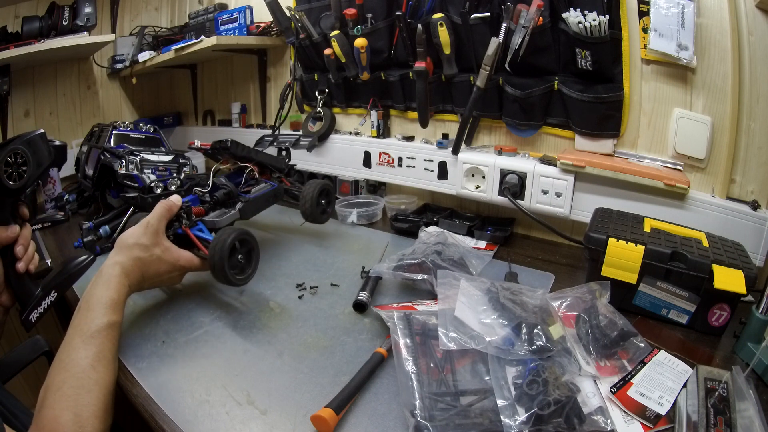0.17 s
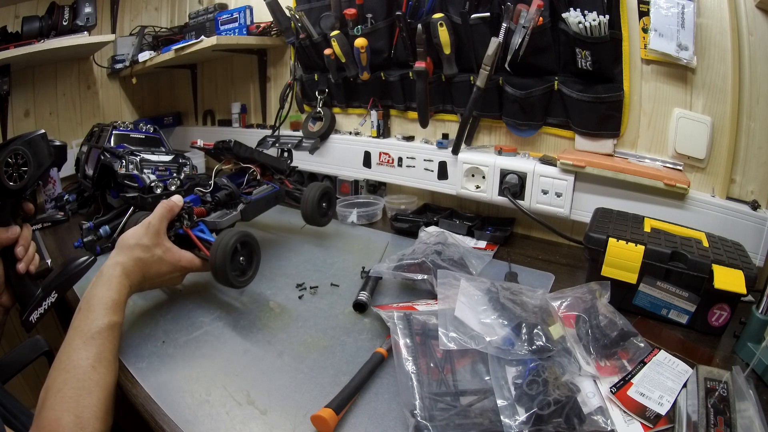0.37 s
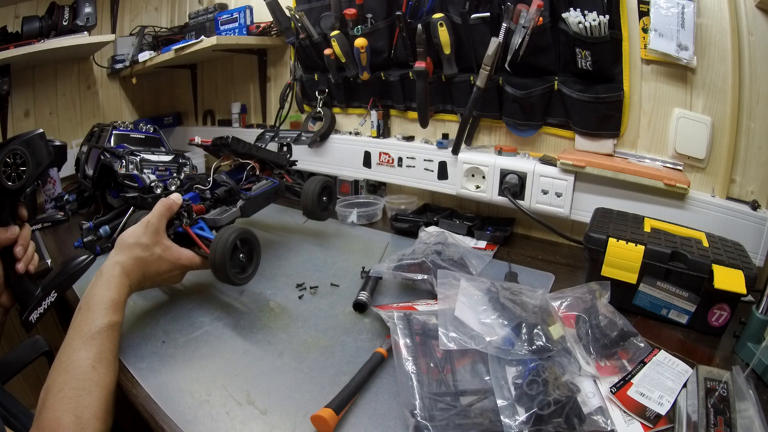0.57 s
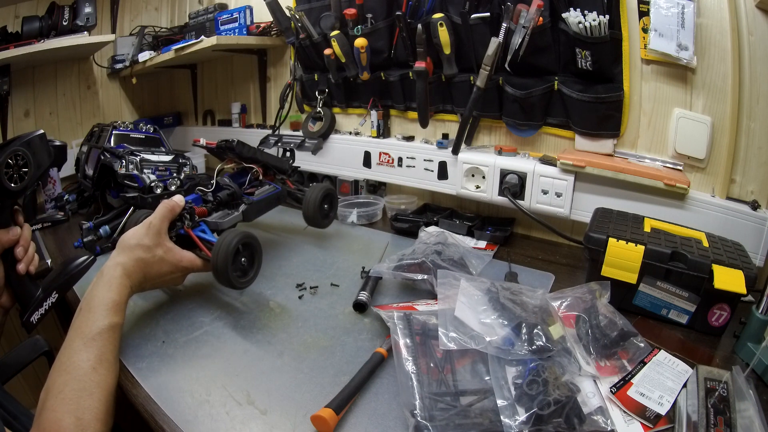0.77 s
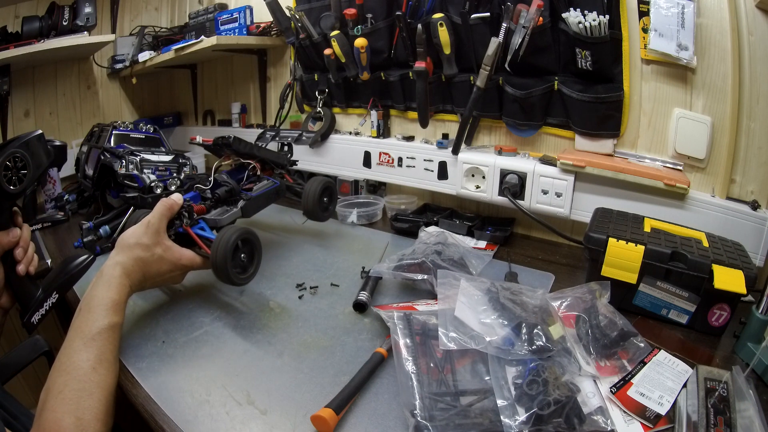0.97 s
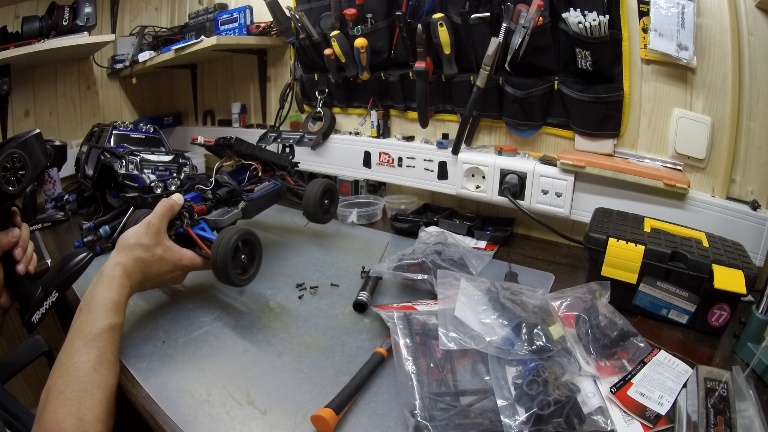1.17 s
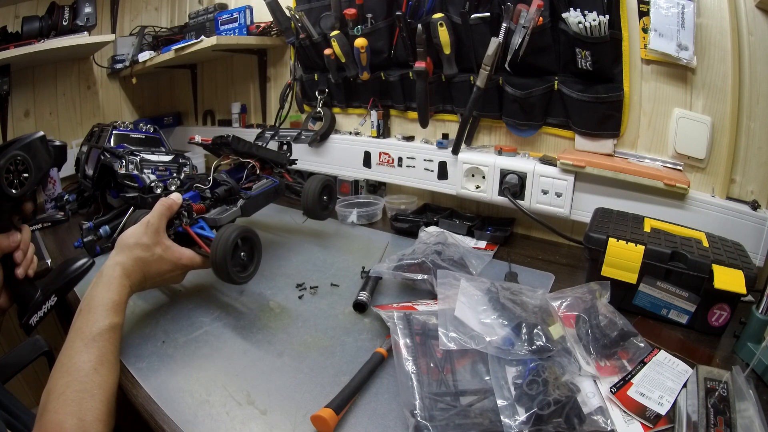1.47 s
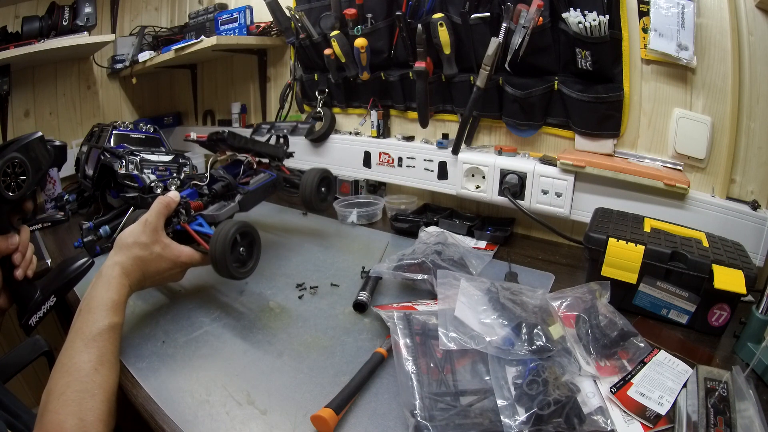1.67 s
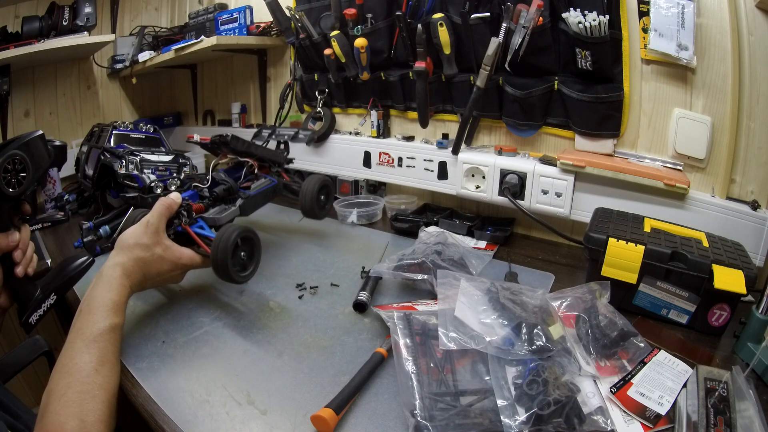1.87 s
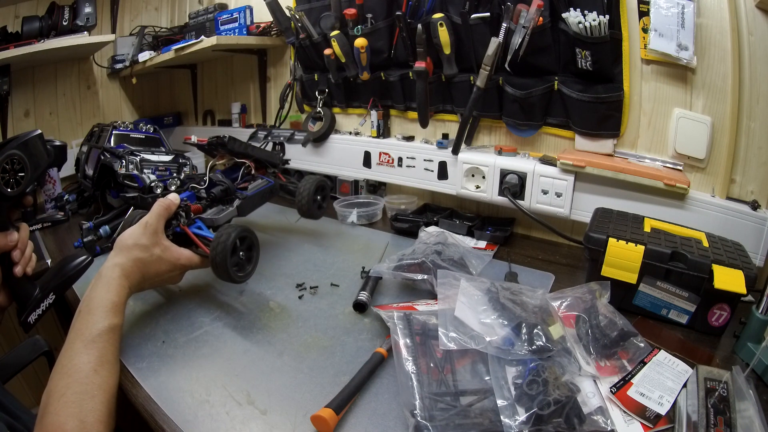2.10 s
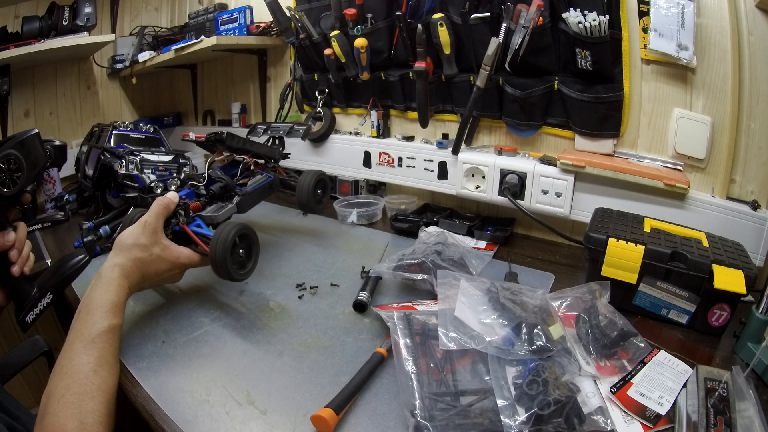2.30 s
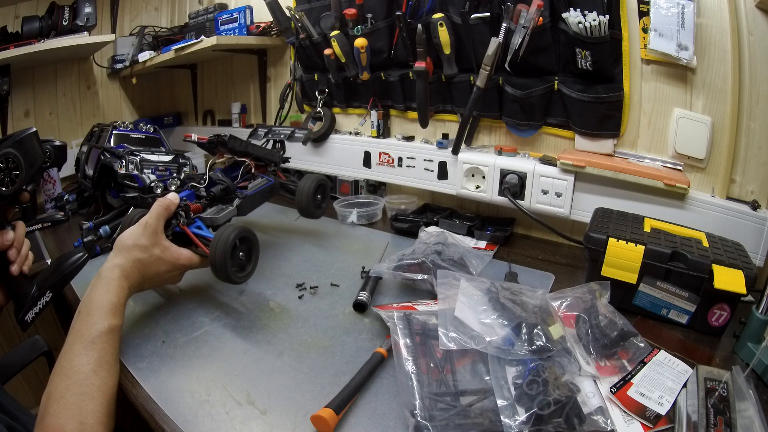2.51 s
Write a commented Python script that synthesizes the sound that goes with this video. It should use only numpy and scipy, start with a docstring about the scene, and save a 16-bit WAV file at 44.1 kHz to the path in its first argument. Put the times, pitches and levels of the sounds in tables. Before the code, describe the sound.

Two whirring, rattling bursts from a small electric model car, its wheels spinning freely.

```python
"""A thin motor whistle swells, then gear teeth clatter and whine: a radio-controlled car, held with its
wheels off a workbench, is run up to full speed twice. Switched current makes the windings whistle;
tooth impacts ring the gears and the plastic chassis, and the turning shafts add harmonics. Near the end
of each run-up and on braking the drivetrain chatters hard and overloads the microphone.
Between the runs the car coasts and its slack gears tick."""
import sys
import numpy as np
from scipy import signal
from scipy.fft import rfft, irfft
from scipy.io import wavfile
from scipy.ndimage import uniform_filter1d

SR = 44100
rng = np.random.default_rng(int(sys.argv[2]) if len(sys.argv) > 2 else 0)


def store_wav(level_fs):
    """Save 16-bit WAV to argv[1]."""
    pcm = np.round(np.clip(np.atleast_2d(level_fs), -1, 1) * 32767)
    wavfile.write(sys.argv[1], SR, pcm.T.astype(np.int16))


N = 116865
T = np.arange(N) / SR

# Modes of the chassis and gear case. Each row: frequency in Hz, width in Hz, boost in dB.
BODY_MODES = [(512, 25, 8), (722, 110, 5), (1043, 13.7, 9), (1115, 22, 9), (1543, 34, -2.5), (1644, 63, 7),
              (2259, 14, 2), (2416, 103, 4.5), (3780, 54, 2), (7250, 200, 3), (12050, 300, 0.5)]


def amp(db):
    """Amplitude grows tenfold with every 20 dB."""
    return 10 ** (np.asarray(db) / 20)


def unit(x):
    """Normalisation to an rms of 1."""
    return x / np.sqrt(np.mean(x ** 2) + 1e-20)


def curve(rows, column=1):
    """Linear interpolation of one column over time."""
    rows = np.array(rows)
    return np.interp(T, rows[:, 0], rows[:, column])


def colour(x, spectrum, modes=()):
    """A minimum-phase filter imposes a spectrum and its resonances, falling steeply outside it."""
    hz, db = np.transpose(spectrum)
    bins = np.fft.rfftfreq(8192, 1 / SR)
    log_hz = np.log(bins + 1)
    outside = np.maximum(np.log(hz[0]) - log_hz, 0) + np.maximum(log_hz - np.log(hz[-1]), 0)
    modes_db = sum(boost / (1 + (2 * (bins - at) / width) ** 2) for at, width, boost in modes)
    shape_db = np.interp(log_hz, np.log(hz), db) + modes_db - 50 * outside
    log_gain = np.log(amp(np.maximum(shape_db, -90)))
    mirrored = np.r_[log_gain, log_gain[-2:0:-1]]
    taps = np.fft.ifft(np.exp(np.conj(signal.hilbert(mirrored)))).real
    return signal.fftconvolve(x, taps[:len(taps) // 2])[:N]


def band(hz, width_hz):
    """Noise through one steep resonance; centred on 0 Hz it is a slow random fluctuation."""
    bins = np.fft.rfftfreq(N, 1 / SR)
    return unit(irfft(rfft(rng.standard_normal(N)) / (1 + (2 * (bins - hz) / width_hz) ** 4), N))


def blows(rows, decay_s):
    """Damping makes the envelope of each sudden blow decay exponentially."""
    return sum(amp(db) * (T >= start) * np.exp(-abs(T - start) / decay_s) for start, db in rows)


def impacts(speed):
    """Shot noise: teeth strike at random, more densely with speed, over a steady rub."""
    per_second = 500 + 4500 * speed
    hits = (rng.random(N) < per_second / SR) * rng.choice([-1, 1], N)
    hits = hits * amp(np.clip(rng.standard_normal(N), -2, 2))
    local_power = abs(uniform_filter1d(hits ** 2, size=900))
    rub = 0.37 * rng.standard_normal(N)
    return unit(hits / np.sqrt(local_power + 1e-4) + rub)


def room_noise():
    """Stationary coloured noise forms the faint background of the room."""
    # Ambient spectrum. Each row: frequency in Hz, relative level in dB.
    spectrum = [(15, -54), (25, 0.5), (326, -8.5), (952, -5), (2020, -16.5), (2700, -12), (4380, -15),
                (12100, -12.5), (15000, -25)]
    return amp(-54) * unit(colour(rng.standard_normal(N), spectrum))


def workshop(x, t60_s=0.097, wet_db=-10):
    """Reverberation: sparse reflections from the bench and cluttered walls die away quickly."""
    t = T[:SR // 3]
    tail = rng.standard_normal(len(t)) * (rng.random(len(t)) < .06)
    tail *= (t > .002) * amp(-60 * t / t60_s)
    reflections = signal.fftconvolve(x, tail / np.linalg.norm(tail))[:N]
    return (x + amp(wet_db) * reflections) / np.hypot(1, amp(wet_db))


def overload_rumble():
    """A low rumble of shaped noise swells while the loudest chatter overloads the microphone."""
    # Swells of the rumble. Each row: centre in seconds, half width in seconds, level in dB.
    swells = [(0.662, 0.023, -33), (0.738, .024, -42), (1.577, 0.016, -39), (2.34, 0.022, -36)]
    # Rumble spectrum. Each row: frequency in Hz, relative level in dB.
    spectrum = [(25, -9), (120, 4.5), (400, -1.5), (900, -10)]
    envelope = sum(amp(db) * np.exp(-((T - centre) / width) ** 2) for centre, width, db in swells)
    return unit(colour(rng.standard_normal(N), spectrum)) * envelope


def coasting():
    """Backlash lets the unloaded gears tick, and the car bumps softly in the hand."""
    # Gear ticks and soft bumps. Each row: start in seconds, level in dB.
    ticks = [(1.703, -36), (1.731, -35), (1.757, -38), (1.809, -34), (1.865, -39.5), (1.884, -43),
             (1.913, -30), (1.954, -34), (1.999, -36.5), (2.025, -39)]
    bumps = [(2.04, -42), (2.1, -42)]
    # Tick spectrum. Each row: frequency in Hz, relative level in dB.
    spectrum = [(300, -23), (1000, -1.5), (3000, -3), (7000, -7.5), (12000, -16.5), (15000, -19)]
    ring = unit(colour(impacts(speed=.5), spectrum, BODY_MODES))
    thud = band(378, width_hz=470)
    return ring * blows(ticks, decay_s=0.014) + thud * blows(bumps, decay_s=0.028)


def take_up():
    """Impact excitation: the gears take up their slack and ring the gear case."""
    # Knock of the gears. Each row: start in seconds, level in dB.
    knocks = [(.179, -29.5)]
    return band(1075, width_hz=200) * blows(knocks, decay_s=0.054)


def windings(switch_hz=3050, swell_db_per_s=130, fade_s=0.005):
    """Switched current drives the windings at its harmonics, ever louder as the motor starts."""
    # Whistles. Each row: start and length in seconds, final level in dB, slope in dB per harmonic.
    whistles = [(0.112, 0.071, -41, 0.5), (2.101, 0.031, -31, -4.5)]
    whistle = np.zeros(N)
    for start, length, db, slope_db in whistles:
        end = start + length
        tone = unit(sum(amp(slope_db * k) * np.cos(2 * np.pi * k * switch_hz * T) for k in range(1, 6)))
        gate = np.clip(np.minimum(T - start, end - T) / fade_s, 0, 1)
        whistle += amp(db - swell_db_per_s * np.maximum(end - T, 0)) * tone * gate
    roughness = 1 + 0.35 * band(0, 300)
    return whistle * roughness


def whine(speed, wheel_hz=56, fade_s=0.2):
    """Rotation is periodic: shaft harmonics and the hum of unbalanced wheels follow the speed in pitch."""
    # Shaft harmonics. Each row: full-speed frequency in Hz, relative dB in the first run and the second.
    harmonics = [(4453, -48, -33), (7203, -36, -46), (8067, -46, -39), (8355, -34, -47), (8931, -41, -43),
                 (10948, -38, -48), (11812, -35, -44), (12101, -35, -44), (12388, -37, -42),
                 (12965, -36, -48), (14117, -38, -52), (14406, -36, -45)]
    # Wheel hum. Each row: time in seconds, level in dB.
    hum_levels = [(.7, -71), (.97, -63.5), (1.12, -56), (1.6, -53), (1.66, -90), (2.35, -78), (2.65, -56)]
    cycles_per_hz = np.cumsum(speed) / SR
    first_run, second_run = (np.clip(np.minimum(T - start, end - T) / fade_s, 0, 1)
                             for start, end in ((.85, 1.6), (2.34, 2.8)))
    tones = np.zeros(N)
    for hz, first_db, second_db in harmonics:
        level = first_run * amp(first_db) + second_run * amp(second_db)
        waver = 1 + 0.33 * band(0, 30)
        tones += level * waver * np.sin(2 * np.pi * (hz * cycles_per_hz + rng.random()))
    hum = amp(curve(hum_levels)) * unit(np.sin(2 * np.pi * wheel_hz * cycles_per_hz))
    return amp(-2.5) * tones + hum


def squeal(half_width_s=0.016, jitter_hz=40.63):
    """Resonance: the hardest chatter locks briefly into rough tones, one taking over from another."""
    # Ringing tones. Each row: centre in seconds, frequency in Hz, relative level in dB.
    rings = [(.678, 7300, -14), (.7, 4280, -17), (.703, 5238, -21), (.703, 5825, -21), (.7, 7757, -16),
             (.708, 6750, -18), (.695, 9033, -19), (.705, 8344, -20), (.718, 9550, -17), (.698, 10870, -15),
             (.694, 11600, -16), (.712, 11902, -13), (.712, 13200, -18), (1.578, 11500, -17),
             (2.343, 12400, -16)]
    tones = np.zeros(N)
    for centre, hz, db in rings:
        envelope = np.exp(-((T - centre) / half_width_s) ** 4)
        roughness = 1 + 0.38 * band(0, 270)
        phase = 2 * np.pi * np.cumsum(hz + jitter_hz * band(0, 77.4)) / SR
        tones += amp(db) * envelope * unit(roughness * np.sin(phase))
    return amp(2) * tones


def drivetrain(speed, dull_hz=4400, flutter_db=1.21):
    """Impacts excite bright modes in the gears and lower ones in the chassis; slow impacts are duller."""
    # Clatter, stage by stage. Each row: time in seconds, tooth level in dB, chassis re teeth in dB.
    at_rest = [(0, -45, -7), (.06, -69, -11), (.13, -66, 6), (.162, -41.5, 1.5)]
    first_run = [(0.18, -24, -6.5), (.205, -22, -4), (0.227, -10, -11.5), (0.332, -14.5, -14),
                 (0.35, -19.5, -9.5), (0.476, -21.5, -7.5), (0.54, -15, -10.5), (0.562, -23, -4),
                 (0.579, -13, -9.5), (0.657, -1.5, -22.5), (0.69, -12, -23), (.712, -12, -23),
                 (0.73, -3.5, -27), (0.81, -20, -17.5), (0.87, -24, -13.5), (1.18, -15.5, -11),
                 (1.497, -16.5, -10), (1.514, -11, -13.5), (1.551, -19.5, -9), (1.573, -3, -23),
                 (1.6, -9.5, -26), (1.635, -21.5, -12), (1.73, -40, -10), (1.785, -43, -1.5)]
    coast = [(1.85, -49, 1.5)]
    second_run = [(2.09, -44, 1), (2.118, -29.5, -13), (2.128, -27, -3.5), (2.16, -21, -6.5),
                  (2.2, -8, -14.5), (2.256, -13.5, -13), (2.33, -5, -24.5), (2.355, -4, -27),
                  (2.41, -24.5, -14.5), (2.65, -21, -8.5)]
    # Spectra of the teeth and the plastic chassis. Each row: frequency in Hz, relative level in dB.
    teeth_spectrum = [(1760, -29), (3000, -17.5), (3490, -13), (3790, -5.5), (4370, -4.5), (5190, -4),
                      (5630, -2.5), (6460, -3.5), (7110, -2), (7710, -3.5), (8370, -1), (9940, -3),
                      (12000, 1), (14700, -9.5), (15400, -14.5)]
    chassis_spectrum = [(120, -27.5), (300, -24.5), (450, -19), (700, -9.5), (1000, -1.5), (1400, -0.5),
                        (1900, -4), (2600, 0), (3300, -6), (4200, -11)]
    clatter = at_rest + first_run + coast + second_run
    teeth_db = curve(clatter)
    chassis_db = teeth_db + curve(clatter, column=2)
    bright = unit(colour(impacts(speed), teeth_spectrum, BODY_MODES))
    dull = unit(signal.lfilter(*signal.butter(1, dull_hz, fs=SR), bright))
    teeth = speed * bright + (1 - speed) * dull
    chassis = unit(colour(impacts(speed), chassis_spectrum, BODY_MODES))
    flutter = amp(flutter_db * band(0, 94))
    return (teeth * amp(teeth_db) + chassis * amp(chassis_db)) * flutter


def scene():
    """Superposition: the sounds of the car add to the room noise, close by and in the centre."""
    # Motor speed. Each row: time in seconds, fraction of full speed.
    motor_speed = [(.16, .03), (.22, .65), (.64, .96), (.85, 1), (1.58, 1), (1.62, .8), (1.75, .15),
                   (2.12, .03), (2.18, .65), (2.3, .96), (2.45, 1)]
    speed = curve(motor_speed)
    clatter = workshop(drivetrain(speed) + coasting() + take_up())
    foreground = clatter + whine(speed) + overload_rumble() + squeal() + windings()
    return np.tile(foreground + room_noise(), (2, 1))


def record(dry, drive_db=0.5, ceiling=0.97, cutoff_hz=15500):
    """The level dips briefly, overload clips the peaks, and a low-pass filter limits the bandwidth."""
    # Dips in level. Each row: start in seconds, length in seconds, gain in dB.
    dips = [(0.166, 0.014, -26.5), (0.2014, 0.0081, -35), (0.4927, 0.0048, -21), (.5865, 0.0018, -18),
            (1.562, 0.0021, -18), (1.77, .02, -2.5), (1.877, 0.0033, -13), (2.1466, 0.0064, -20.5),
            (2.16, 0.0012, -12), (2.1647, 0.0014, -15), (2.171, 0.0014, -16)]
    steps_db = sum(db * (T > start) * (T < start + length) for start, length, db in dips)
    dips_db = uniform_filter1d(steps_db, size=50)
    clipped = np.clip(dry * amp(dips_db + drive_db), -ceiling, ceiling)
    low_pass = signal.firwin(511, cutoff_hz, window=("kaiser", 9), fs=SR)
    return signal.oaconvolve(clipped, low_pass[None], "same")


dry = scene()
out = record(dry)
store_wav(out)
```